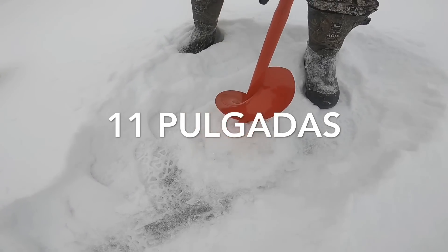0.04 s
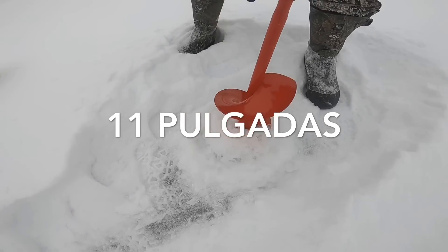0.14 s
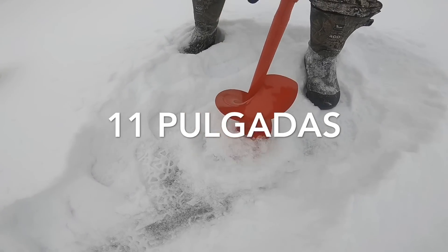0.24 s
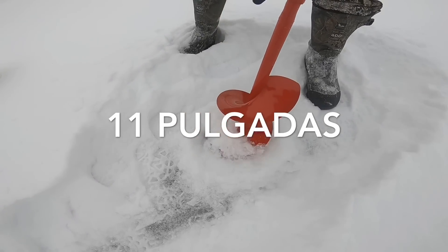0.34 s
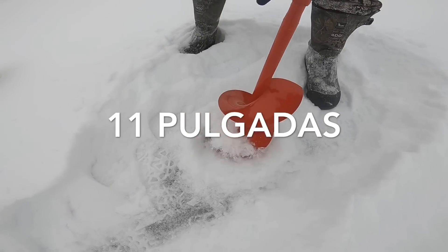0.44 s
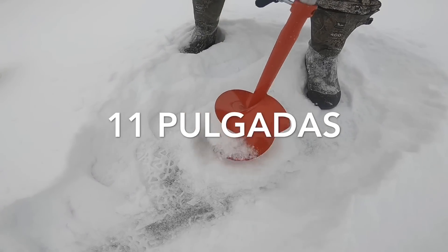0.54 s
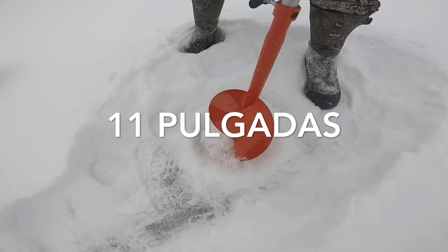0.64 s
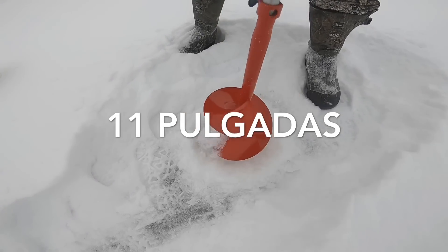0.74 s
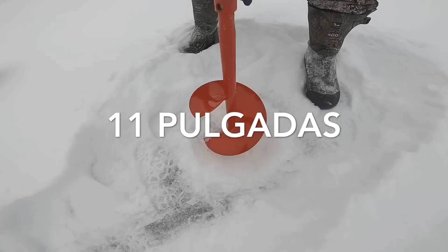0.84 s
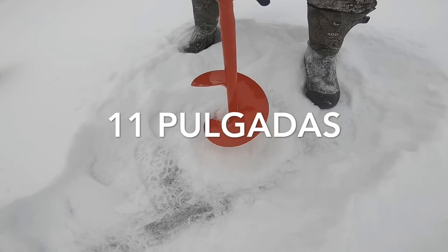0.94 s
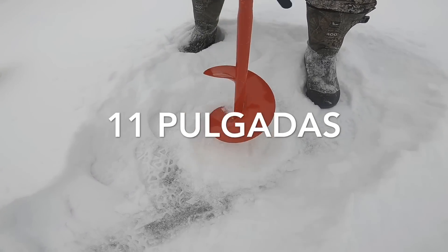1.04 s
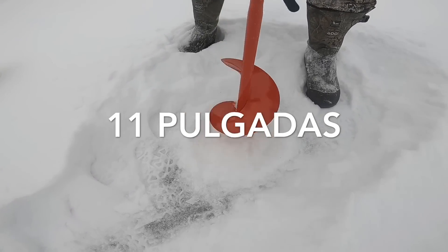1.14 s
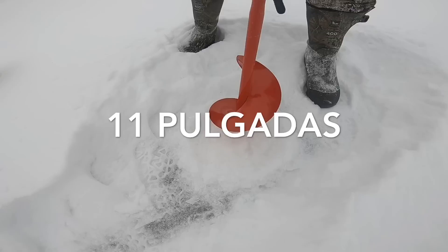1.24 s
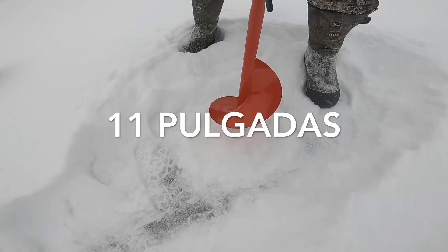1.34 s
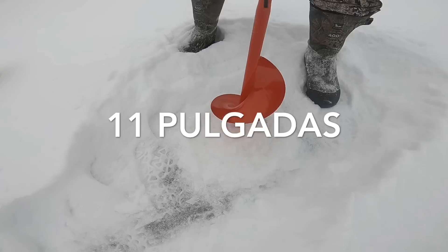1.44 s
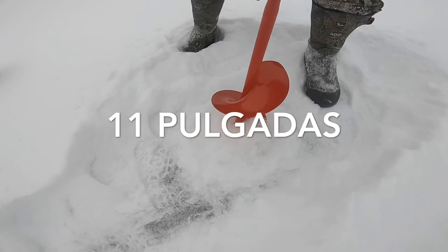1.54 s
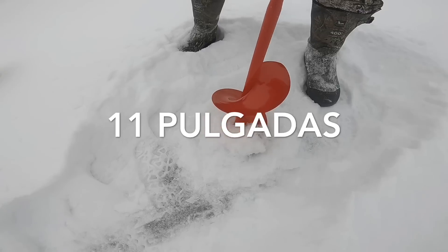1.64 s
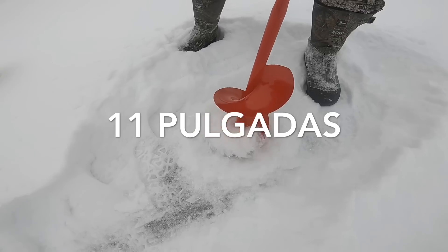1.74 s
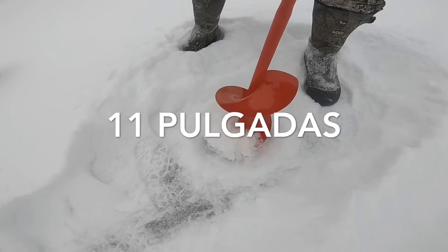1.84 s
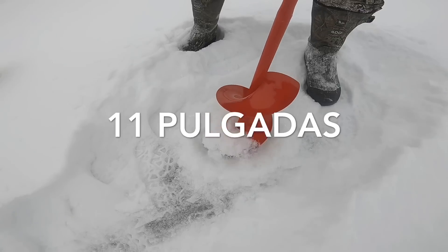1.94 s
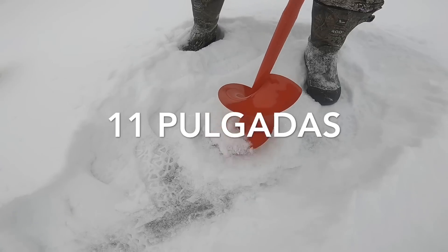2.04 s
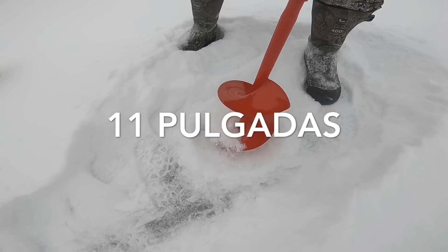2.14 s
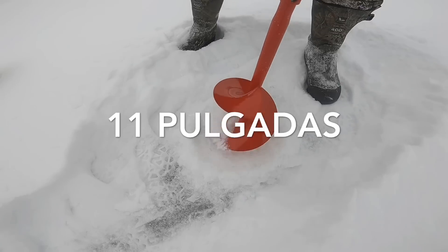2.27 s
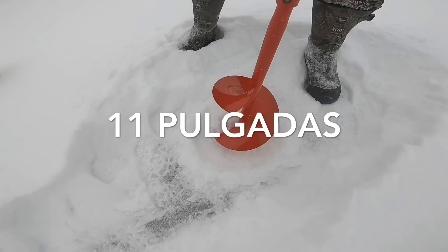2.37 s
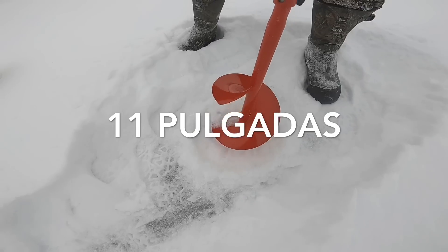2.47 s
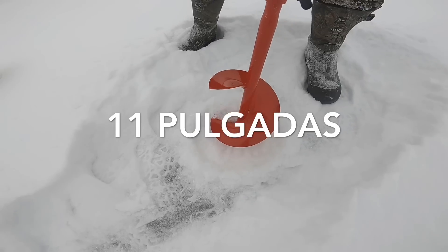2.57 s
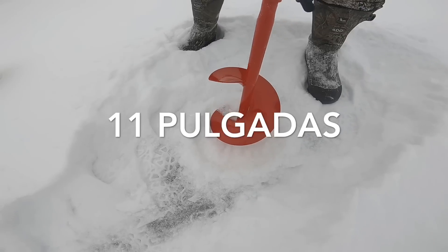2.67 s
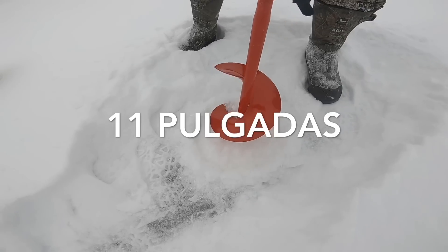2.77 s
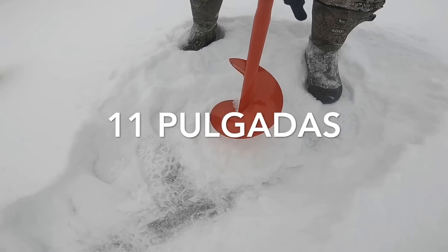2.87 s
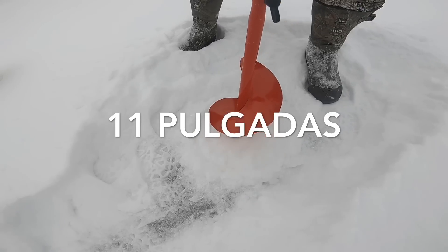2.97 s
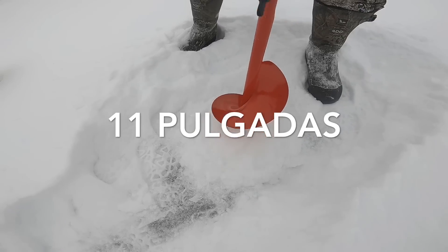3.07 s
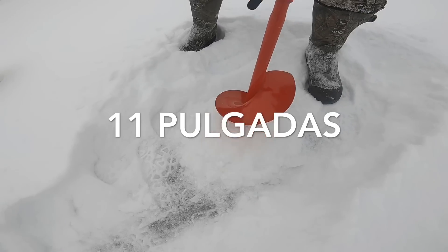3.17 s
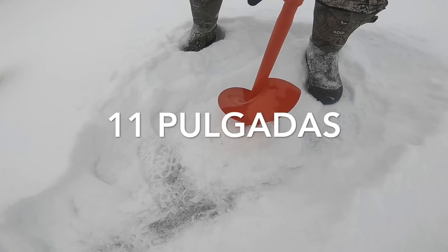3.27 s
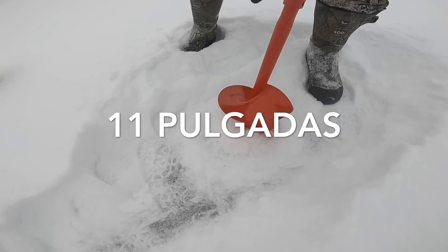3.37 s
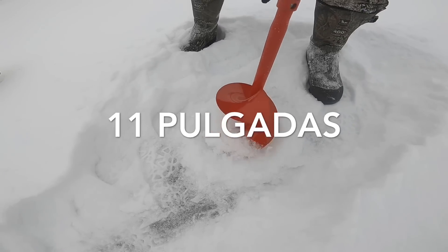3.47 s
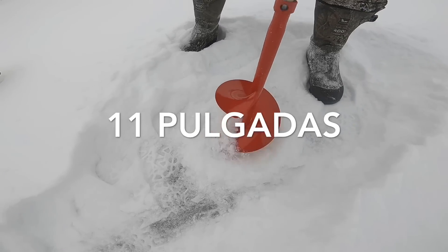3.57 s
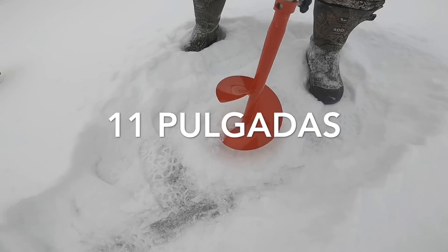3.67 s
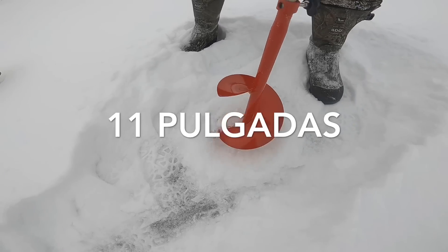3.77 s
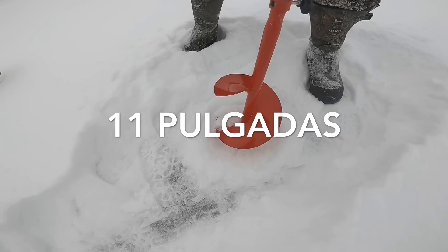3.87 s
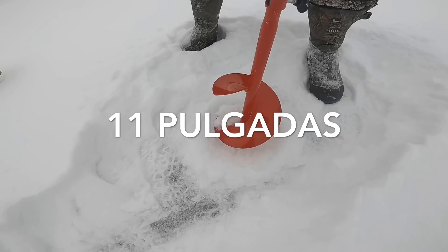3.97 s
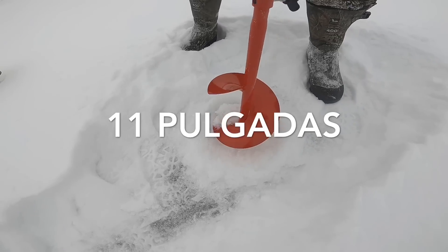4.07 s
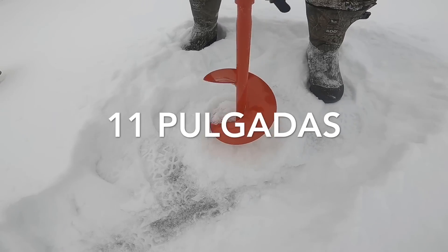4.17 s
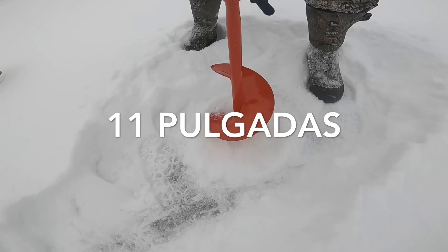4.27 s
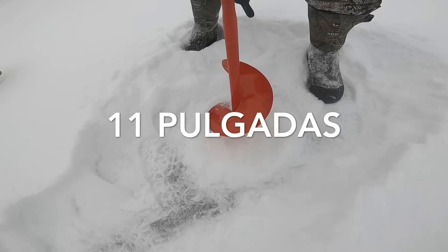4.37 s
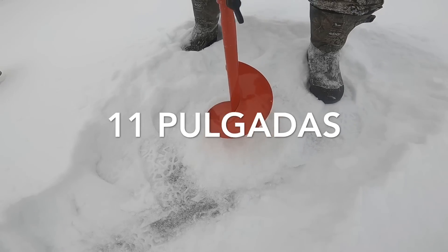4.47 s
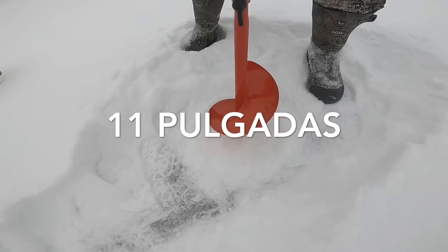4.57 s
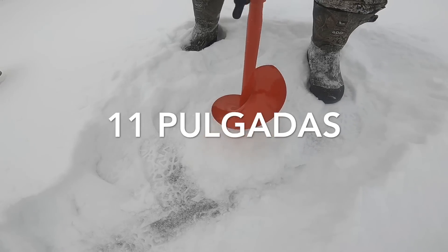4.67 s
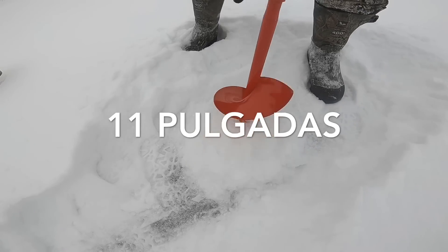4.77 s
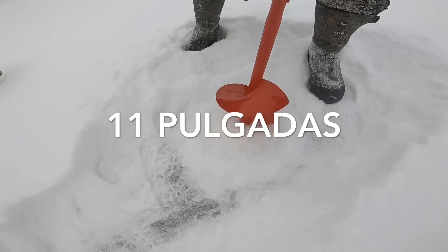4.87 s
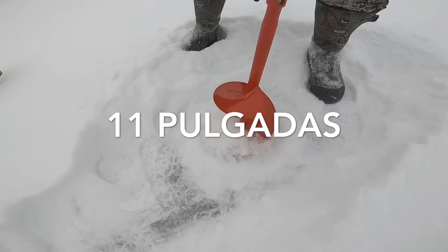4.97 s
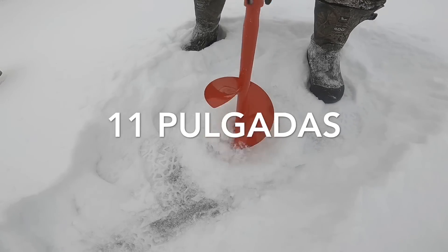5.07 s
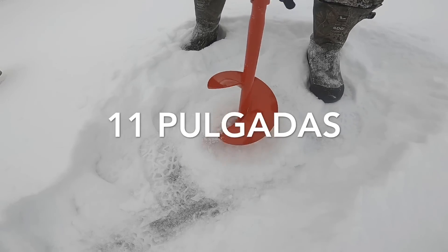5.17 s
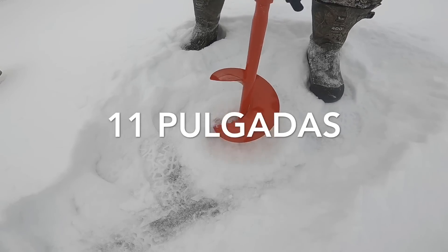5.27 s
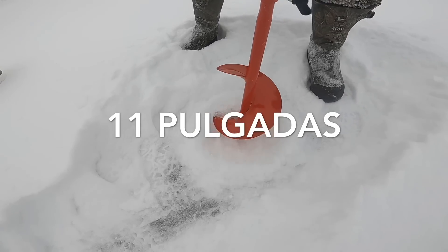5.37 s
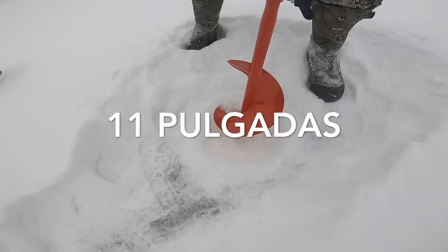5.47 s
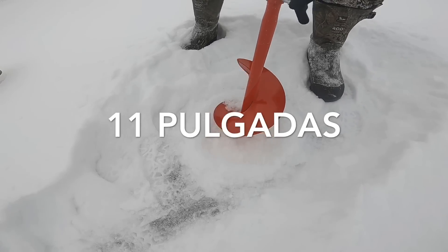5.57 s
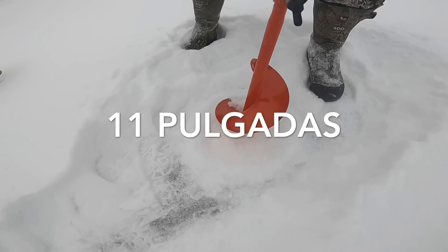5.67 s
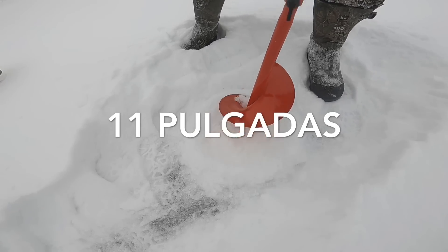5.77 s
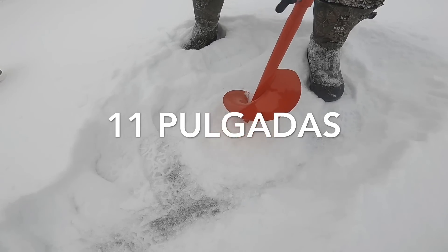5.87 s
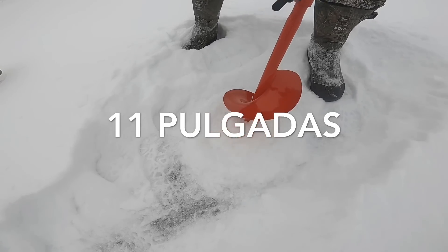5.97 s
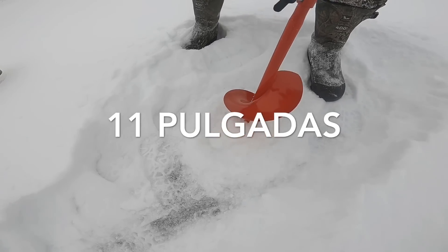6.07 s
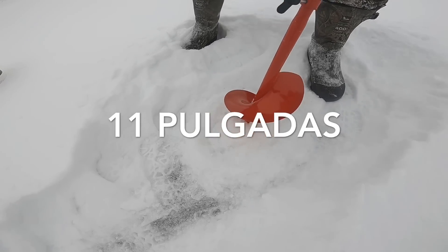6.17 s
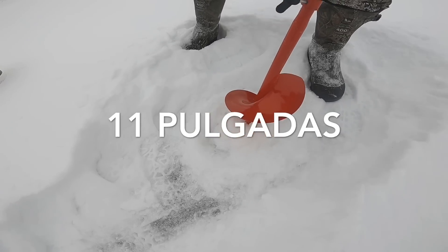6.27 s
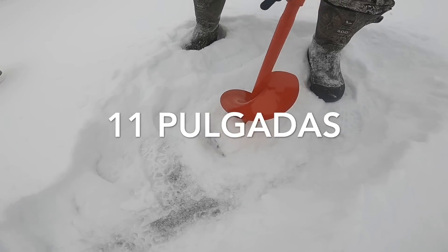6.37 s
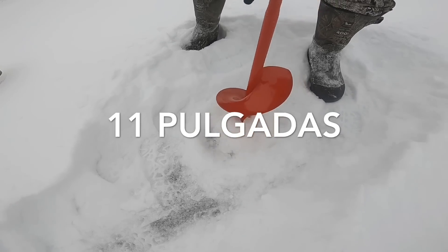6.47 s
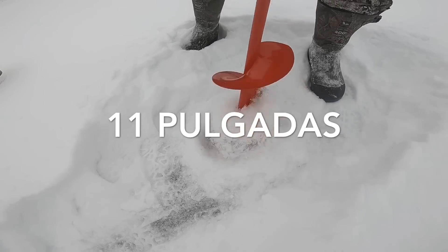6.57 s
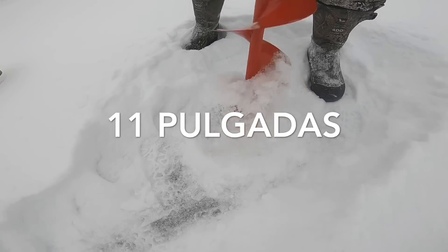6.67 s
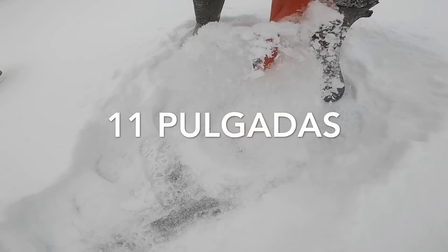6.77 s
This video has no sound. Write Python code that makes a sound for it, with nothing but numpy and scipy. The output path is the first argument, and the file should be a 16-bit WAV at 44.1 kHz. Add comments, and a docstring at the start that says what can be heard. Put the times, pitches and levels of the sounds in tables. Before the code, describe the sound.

Close stereo pickup in quiet open air: steel blades scrape and crunch through ice in irregular hand-cranked strokes, first separate, then running together. A hollow mid-pitched hum and metallic ring colour the coarse, crackly grating. Blades catch with dry snaps, particularly before and during the second half. After the last stroke come near-silence, a loud crack, a short clanky scrape as the auger is lifted, and loose snow rustling faintly.

```python
"""Hand auger in lake ice

A hand auger is cranked into lake ice, close by, in the open air. Stick-slip bites of the blades
release trains of tiny fractures, which drive the resonances of the steel spiral; the blades ring most
when they face the listener. Sharp catches and single chips snap off during the pushes and in the pauses.
At the end the auger is pulled up with a bright scrape; loose snow and shavings rustle, over faint air.
"""
import sys
import numpy as np
from scipy import signal
from scipy.fft import rfft, irfft
from scipy.io import wavfile
from scipy.ndimage import uniform_filter1d

SR = 44100
rng = np.random.default_rng(int(sys.argv[2]) if len(sys.argv) > 2 else 0)


def unload_audio(sound):
    """Save the sound as a 16-bit wav file, at the path given as the first command line argument."""
    columns = np.transpose(np.atleast_2d(sound))
    # keep every value between -1 and 1, then stretch to whole-number steps
    steps = np.round(np.clip(columns, -1, 1) * 32767)
    wavfile.write(sys.argv[1], SR, steps.astype(np.int16))


N = 300762  # samples

# Pushes on the crank, each a cut; the last row is a second crunch as the auger lifts:
# start t/s, end t/s, level/dB, swell from start to end/dB, thud of coarse chips re cut/dB,
# favoured resonance f/Hz, relative level of that resonance/dB
CUTS = [(-0.02, 0.131, -26.5, -1.5, -4.5, 2330, -9), (0.433, 0.626, -24.5, -7, -8.5, 885, -9),
        (0.673, 0.929, -24, 7.5, -10, 2960, -10), (0.908, 1.09, -30, -3, -4, 1980, -4.5),
        (1.079, 1.292, -27.5, 1.5, -15.5, 2640, -22), (1.397, 1.548, -29, 0.5, -8, 1630, -11),
        (1.697, 1.861, -28.5, 14, -9, 650, -3), (1.936, 1.965, -31, 1, 2.5, 846, 1.5),
        (2.025, 2.176, -24.5, 3.5, -12.5, 2860, -10.5), (2.168, 2.425, -26.5, 4.5, -10.5, 598, -3),
        (2.444, 2.588, -27.5, 8, -3, 575, -3), (2.603, 2.86, -28, 5, -0.5, 2010, -2.5),
        (2.854, 3.095, -28.3, 7, -4.5, 1970, -3), (3.08, 3.423, -27, -2, -1, 3190, -7),
        (3.376, 3.729, -26.5, 1, -2.5, 3100, -14), (4.126, 4.229, -27, 4.5, 2, 590, -7),
        (4.272, 4.458, -27, -5, -5.5, 1310, -8.5), (4.482, 4.683, -25.5, 2.5, -7, 1650, -13),
        (4.679, 4.838, -25, 1, -11, 3330, -5), (4.851, 5.117, -25.5, 1, -13, 1730, -11.5),
        (5.117, 5.27, -33, -12, -11.5, 533, -7), (5.278, 5.596, -31.5, 0.5, -4.5, 1960, -4.5),
        (5.585, 5.916, -26, 2.5, -6.5, 2040, -5), (6.594, 6.63, -29.5, -4.5, 2, 900, -5)]
# Light scraping of the resting blades between cuts: start t/s, end t/s, level/dB
DRAGS = [(0.454, 1.585, -36), (1.668, 1.965, -36.5), (1.995, 3.735, -35.5), (4.04, 4.1, -37),
         (4.136, 4.46, -31.5), (4.5, 5.92, -35), (6.206, 6.231, -33), (6.486, 6.528, -34.5)]
# Moments when the blades face the listener, once a turn: t/s
FACING_TIMES = [0.1, 1.72, 3.15, 4.63, 5.82]
# Single chips snapping off: t/s, relative level/dB
TICKS = [(0.046, -17), (0.537, -20), (0.582, -21), (0.6, -19), (0.646, -17.5), (1.178, -22.5), (1.215, -23),
         (2.056, -16), (3.006, -22.5), (3.669, -14.5), (4.829, -19), (5.522, -18), (5.55, -17.5),
         (6.017, -38.5), (6.117, -32), (6.172, -32.5), (6.363, -35.5)]
# Blades catching and cracking the ice: t/s, relative level/dB, thud re that/dB, fizz re that/dB (offsets follow)
CRACKS = [(0.44, -5.5, -38, -18), (1.051, -7.5, -32, -24), (1.665, -21, -11, -17), (1.749, -6, -42, -18),
          (1.859, -7, -21, -14.5), (1.891, -4, -26, -14), (2.007, -6, -18, -14), (2.413, -14, -7, -8.5),
          (3.943, -14, -25, -17.5), (4.027, -10, -32, -19), (4.106, -12.5, -15.5, -6),
          (4.138, -3, -20.5, -19), (4.204, -8, -12, -22), (4.273, -10, -20, -16), (4.431, -10, -15, -31.5),
          (4.45, -10.5, -14.5, -12), (4.493, -8, -18, -25), (4.607, -8, -22, -15), (4.872, -9.5, -16, -26),
          (6.207, -0.5, -17, -20.5), (6.487, -13.5, -17, -16)]
# Decay of a crack in the voices thud, plate, blade, crunch, fizz: 60 dB decay time t/s
CRACK_T60 = [0.11, 0.016, 0.046, 0.03, 0.038]
# Broad colour of the auger in the ice: f/Hz, relative level/dB
BODY_COLOUR = [(25, -22.5), (60, -6.5), (150, 4.5), (260, -2), (390, -11.5), (480, -9), (1280, -2),
               (2100, -2.5), (3800, -6), (4700, -21), (5400, -15), (6900, -19), (9000, -35), (12400, -37),
               (15000, -54)]
# Resonances of the steel spiral and shaft: f/Hz, width f/Hz, level over the broad colour/dB
BODY_MODES = [(497.4, 44, 7.5), (606.7, 126, 10), (861, 88, 7.5), (1000, 165, 3), (1617, 143, 10),
              (1806, 65, 4), (3353, 200, 5)]
# Thin note of the blade edge: start t/s, f/Hz, initial level/dB, 60 dB decay time t/s
EDGE_NOTE = (4.5, 5495, -28, 0.22)
# Pulling the auger up: t/s, level/dB
LIFT_LEVEL = [(6.5, -42), (6.539, -29.5), (6.554, -15.5), (6.578, -18), (6.599, -31)]
# Broad colour of the lifting scrape: f/Hz, relative level/dB
LIFT_COLOUR = [(40, -32), (200, -4), (350, -15.5), (3400, -7.5), (4600, -15), (7000, -12), (9000, -27),
               (15000, -35)]
# Resonances of the freed blades: f/Hz, width f/Hz, level over the broad colour/dB
LIFT_MODES = [(506, 160, 9), (935, 80, 9), (1090, 57, 9), (1710, 110, 10), (2564, 96, 10.5),
              (6070, 400, 9.5)]
# Soft rustle of loose snow: t/s, level/dB
RUSTLE_LEVEL = [(.3, -55.5), (1.63, -52.5), (3.85, -59.5), (6.0, -56), (6.42, -51.5), (6.73, -43),
                (6.82, -52)]
# Colour of the rustle: f/Hz, relative level/dB
RUSTLE_COLOUR = [(330, -11), (850, 3.5), (4700, 1.5), (6800, 6.5), (8800, -8), (12500, -10), (15000, -27)]
# Colour of the air: f/Hz, relative level/dB
AIR_COLOUR = [(60, 0), (165, 4.5), (650, -29)]
# Two microphone ports, level difference: f/Hz, left re right level/dB
PORT_BALANCE = [(200, -4), (480, -8.5), (640, -11), (1100, 0), (4000, -1), (8300, 0.1)]
# Two microphone ports, phase difference: f/Hz, lead of left [rad]
PORT_PHASE = [(300, 0.11), (540, 0.4), (720, 1.35), (1450, 1.11), (2400, 0.2)]
# Two microphone ports, coherence: f/Hz, likeness [0 to 1]
PORT_LIKENESS = [(30, 0.76), (100, 0.98), (5500, 1), (9000, 0.28), (12500, 0.93)]

ATTACK_S, RELEASE_T60_S = 0.018, 0.049  # the blades dig in and let go
ARCH_DB = 1.5  # rise from the ends of a cut to its middle
DRAG_THUD_DB = -4  # coarse chips of a drag, relative to the drag
RING_DB, RING_SWING_DB = -8.5, 10.5  # blade ring when turned away (relative), its rise when facing
RING_FOCUS = 1.38  # exponent: a higher one narrows the beam
FIZZ_DB = -10.5  # fine chips, relative
STICK_S, STICK_DB = 0.0094, -4  # length and depth of the stall before the ice cracks
SLIPS_PER_S, SLIP_JITTER = 75, 0.65  # median rate of bites, spread of their log interval
SLIP_DB = 4  # fall of each crunch until the next bite
BITE_DB, BITE_COLOUR_DB = 2.0, 1.3  # limit of the strength variation, spread of each voice
HUM_HZ, HUM_DRIFT, HUM_DB = 593.3, 0.027, -3  # pitch, rms relative drift, relative level
TICK_S = 0.0011  # rise time of a tick
AIR_DB = -56.5
CEILING, EDGE_HZ = .7, 14900  # saturation amplitude, upper band limit


def gain_of(db):
    """Level is twenty times the decimal logarithm of amplitude; this inverts it."""
    return 10 ** (np.asarray(db) / 20)


def evened(x):
    """Normalization to a root-mean-square amplitude of 1."""
    return x / np.sqrt(np.mean(x ** 2) + 1e-20)


def read(points, hz):
    """Linear interpolation of a spectrum on a logarithmic frequency axis."""
    f, value = np.transpose(points)
    return np.interp(np.log(hz + 1), np.log(f + 1), value)


def curve(rows):
    """Linear interpolation in time: each column of a table, sample by sample."""
    s, *columns = np.transpose(rows)
    return [np.interp(np.arange(N) / SR, s, c) for c in columns]


def sounding(rows):
    """Gating: gain along a level curve, zero outside it."""
    t = np.arange(N) / SR
    inside = (t >= rows[0][0]) * (t <= rows[-1][0])
    return gain_of(curve(rows)[0]) * inside


def wander(per_s):
    """Band-passed noise: a smooth random course of rms 1 that changes at about the given rate."""
    ratio = np.fft.rfftfreq(N, 1 / SR) / per_s
    spectrum = rfft(rng.standard_normal(N)) * ratio / (1 + ratio ** 3)
    return evened(irfft(spectrum, N))


def response(colour, modes=(), size=4096):
    """Minimum phase: log magnitude fixes a causal impulse response, here of energy 1."""
    hz = abs(np.fft.fftfreq(size, 1 / SR))
    db = read(colour, hz)
    db = db + sum(lift * np.exp(-2 * ((hz - f) / width) ** 2) for f, width, lift in modes)
    spectrum = np.exp(signal.hilbert(np.log(gain_of(db))).conj())
    taps = np.fft.ifft(spectrum).real
    return taps / np.linalg.norm(taps)


def ring(x, taps):
    """Convolution: a pair of signals excites an impulse response."""
    return signal.oaconvolve(x, taps[None], axes=1)[:, :x.shape[1]]


def resonate(pair, hz, width_hz):
    """Heterodyning: a steep resonance follows the curve hz and keeps the level of noise."""
    t = np.arange(2048) / SR
    decay = t * np.exp(-np.pi * width_hz * t)
    turn = np.exp(2j * np.pi * np.cumsum(hz) / SR)
    shifted = ring(pair / turn, decay / np.linalg.norm(decay))
    return np.sqrt(2) * (turn * shifted).real


def chips(per_s, spread_db, scatter, scatter_t60):
    """Shot noise: tiny fractures of uneven size, each a click and a decaying scatter of splinters."""
    size = gain_of(spread_db * np.minimum(rng.exponential(1, N), 4))
    size = size * (rng.random(N) < per_s / SR)
    energy = signal.lfilter([1], [1, -gain_of(-120 / (scatter_t60 * SR))], size ** 2)
    clicks = size * rng.choice([-1, 1], (2, N))
    splinters = np.sqrt(energy) * rng.standard_normal((2, N))
    return evened(evened(clicks) + scatter * evened(splinters))


def bites():
    """Stick-slip friction: the count rises by one with each bite, at uneven intervals."""
    lengths = np.exp(SLIP_JITTER * rng.standard_normal(N)) / SLIPS_PER_S
    return np.interp(np.arange(N) / SR, np.cumsum(lengths), np.arange(N))


def each_bite(count):
    """Sample and hold: a random value of about rms 1 lasts one bite and jumps at the next."""
    return uniform_filter1d(rng.standard_normal(N)[count.astype(int)], size=48)


def slips(count):
    """Relaxation oscillation: each bite starts abruptly at its own strength, then dies down."""
    strength_db = BITE_DB * np.tanh(each_bite(count))
    fall_db = SLIP_DB * uniform_filter1d(count % 1, size=48)
    return gain_of(strength_db - fall_db)


def sticking():
    """Static friction: the blades stall, dipping the gain just before each crack or tick."""
    stuck = np.zeros(N)
    for s, *_ in CRACKS + TICKS:
        stuck[round((s - STICK_S) * SR):round(s * SR)] = 1
    return gain_of(STICK_DB * uniform_filter1d(stuck, size=128))


def facing():
    """Directivity: 1 when the blades face the listener, 0 half a turn later."""
    turns = np.interp(np.arange(N) / SR, FACING_TIMES, np.arange(len(FACING_TIMES)))
    return np.cos(np.pi * turns) ** 2


def contact(start, end):
    """Contact envelope: linear attack, hold and exponential release."""
    t = np.arange(N) / SR
    attack = np.clip((t - start) / ATTACK_S, 0, 1)
    return attack * gain_of(-60 * np.clip((t - end) / RELEASE_T60_S, 0, 2))


def cut_strengths():
    """Applied force: for each cut, its strength over time and its thud in dB."""
    t = np.arange(N) / SR
    for start, end, db, swell_db, thud_db, _, _ in CUTS:
        along = np.clip((t - start) / (end - start), 0, 1) - .5
        arch = ARCH_DB * (np.cos(np.pi * along) - .5)
        yield contact(start, end) * gain_of(db + swell_db * along + arch), thud_db


def cutting(cuts):
    """Addition of powers: strength of cuts and drags, and their share of coarse chips in dB."""
    power = sum(gain ** 2 for gain, _ in cuts) + 1e-12
    coarse = sum((gain * gain_of(thud_db)) ** 2 for gain, thud_db in cuts) + 1e-12
    drag = sum((contact(start, end) * gain_of(db)) ** 2 for start, end, db in DRAGS)
    drag = np.maximum(drag - power, 0)  # drags only fill in where the cuts are weaker
    total = power + drag
    return np.sqrt(total), 10 * np.log10((coarse + drag * gain_of(DRAG_THUD_DB) ** 2) / total)


def grinding(cuts, count, plate_db=0.5, plate_share=0.46):
    """Clumped brittle fracture under the blades exerts a force on each voice of the auger."""
    bite, thud = cutting(cuts)
    blade = RING_DB + RING_SWING_DB * facing() ** RING_FOCUS
    plate = plate_db + plate_share * thud  # coarse chips also shake the wide spiral
    fractures = chips(per_s=3400, spread_db=1.5, scatter=1, scatter_t60=0.026)
    force = bite * sticking() * evened(slips(count) * fractures)
    voices_db = [db + BITE_COLOUR_DB * each_bite(count) for db in (thud, plate, blade, 0, FIZZ_DB)]
    return gain_of(voices_db)[:, None] * force


def singing(cuts, count, width_share=0.2):
    """Loaded resonance: each cut loads the steel differently, so a broad mode of its own stands out."""
    fractures = chips(per_s=1500, spread_db=4.0, scatter=0.95, scatter_t60=0.014)
    drive = sticking() * evened(slips(count) * fractures)
    out = np.zeros((2, N))
    for (gain, _), (start, end, *_, hz, db) in zip(cuts, CUTS):
        part = slice(max(round(start * SR), 0), round((end + RELEASE_T60_S) * SR))
        pitch = np.full_like(gain[part], hz)
        out[:, part] += gain_of(db) * resonate(gain[part] * drive[:, part], pitch, width_share * hz)
    return out


def humming(cuts, width_hz=85, coarse_share=0.55):
    """Noise-driven resonance: the spiral hums, louder on coarse chips, its pitch wandering at random."""
    bite, thud = cutting(cuts)
    level = bite * sticking() * gain_of(HUM_DB + coarse_share * thud)
    drive = level * rng.standard_normal((2, N))
    return resonate(drive, HUM_HZ * (1 + HUM_DRIFT * wander(per_s=7.0)), width_hz)


def loose_snow():
    """Granular flow: grains of snow and shavings slide and fall, as filtered shot noise."""
    falls = chips(per_s=980, spread_db=6.0, scatter=2.0, scatter_t60=0.18)
    grains = ring(falls, response(RUSTLE_COLOUR))
    return gain_of(curve(RUSTLE_LEVEL)[0]) * evened(grains)


def air():
    """Filtered noise: the faint low rumble of the open lake, swelling a little."""
    rumble = ring(rng.standard_normal((2, N)), response(AIR_COLOUR))
    return gain_of(AIR_DB) * evened(rumble * gain_of(2 * wander(per_s=14.0)))


def ticking(thud_db=-15, plate_db=-13, blade_db=-6, fizz_db=-9):
    """Impulsive excitation: a single chip is a noise burst of a few milliseconds, mostly crunch."""
    t = np.arange(1024) / SR
    hits = np.zeros(N)
    for s, db in TICKS:
        hits[round(s * SR)] = gain_of(db)
    burst = signal.oaconvolve(hits, t / TICK_S * np.exp(1 - t / TICK_S))[:N]
    voices = gain_of([thud_db, plate_db, blade_db, 0, fizz_db])
    return voices[:, None, None] * burst * rng.standard_normal((2, N))


def cracking(crack_db=-9.5, thud_db=8, plate_db=-4, blade_db=-4, fizz_db=8, rise_s=0.001104, hold_s=0.00054):
    """Fracture avalanche: a sharp snap, then fractures that die away at a rate of each voice's own."""
    t = np.arange(SR // 2) / SR
    fall_db = 60 * np.maximum(t - hold_s, 0) / np.array(CRACK_T60)[:, None]
    burst = (1 - np.exp(-t / rise_s)) * gain_of(-fall_db)
    avalanche, snap = np.zeros((2, len(burst), N + len(t)))
    for s, db, thud, fizz in CRACKS:
        voices_db = np.array([thud + thud_db, plate_db, blade_db, 0, fizz + fizz_db])
        voices = gain_of(db + crack_db + voices_db)
        avalanche[:, round(s * SR):][:, :len(t)] += voices[:, None] * burst
        snap[:, round((s + rise_s) * SR)] += voices * gain_of(12)
    fractures = chips(per_s=9900, spread_db=-3.0, scatter=0.55, scatter_t60=0.032)
    return snap[:, None, :N] + avalanche[:, None, :N] * fractures


def edge_note():
    """Free vibration: a thin note of the blade edge, a sine that decays exponentially."""
    s, hz, db, t60 = EDGE_NOTE
    t = np.maximum(np.arange(N) / SR - s, 0)
    return gain_of(db - 60 * t / t60) * np.sin(2 * np.pi * hz * t)


def lifting(crumble_db=1.0):
    """Scraping excitation: the blades rise through crumbling slush, whose fractures make them ring."""
    fractures = chips(per_s=4500, spread_db=-4.5, scatter=0.82, scatter_t60=0.021)
    crumbs = evened(gain_of(crumble_db * wander(per_s=230)) * fractures)
    return ring(sounding(LIFT_LEVEL) * crumbs, response(LIFT_COLOUR, LIFT_MODES))


def below(hz, edge):
    """Low-pass weighting with a steep, smooth edge, symmetric about zero."""
    return 1 / (1 + (hz / edge) ** 12)


def auger(forces, thud_hz=390, plate_hz=730, blade_hz=(880, 1635), blade_width_hz=105, fizz_hz=4400,
          blade_db=-2.0, crunch_db=-2.5):
    """Forced vibration of one body in five bands: ice thud, spiral plate, blades, crunch and fizz."""
    hz = np.fft.rfftfreq(N, 1 / SR)
    body = rfft(response(BODY_COLOUR, BODY_MODES), N)
    thud, low, middle = below(hz, thud_hz), below(hz, plate_hz), below(hz, fizz_hz)
    blade = sum(below(hz - f, blade_width_hz) for f in blade_hz)
    voices = [thud, low - thud, blade, middle - low - blade, 1 - middle]
    levels = gain_of([0, 0, blade_db, crunch_db, 0])
    total = 0
    for force, voice, level in zip(forces, voices, levels):
        band = body * voice
        band = band / np.sqrt(np.mean(abs(band) ** 2))  # equal energy in every voice
        total = total + level * rfft(force) * band
    return irfft(total, N)


def spiral_reflections(pair, echo=0.23, delay_s=(.0013, .0029, .0052), sway=0.0653):
    """Comb filtering: short reflections off the spiral wander in delay, so the colour keeps shifting."""
    n = np.arange(N)
    # only short waves bounce off it
    upper = signal.sosfilt(signal.butter(2, 900, "high", fs=SR, output="sos"), pair)
    out = pair.copy()
    for delay in delay_s:
        late = n - SR * delay * (1 + sway * wander(per_s=0.82))
        out += echo * np.array([np.interp(late, n, side) for side in upper])
    return out


def ports(pair):
    """Partial coherence: a common and a separate part mix into the sound at two close microphone ports."""
    hz = np.fft.rfftfreq(N, 1 / SR)
    common, apart = rfft(pair)
    same = np.clip(read(PORT_LIKENESS, hz), 0, 1)
    apart = apart * np.sqrt((1 - same) / (1 + same))
    lean = gain_of(read(PORT_BALANCE, hz) / 2) * np.exp(.5j * read(PORT_PHASE, hz))
    sides = np.array([(common + apart) * lean, (common - apart) / lean])
    return irfft(sides * 2 / abs(lean + 1 / lean), N)


def scene():
    """Superposition: the auger grinds, sings, hums, cracks and is lifted, over loose snow and air."""
    cuts, count = list(cut_strengths()), bites()
    forces = grinding(cuts, count) + ticking() + cracking()
    steel = auger(forces) + singing(cuts, count) + humming(cuts)
    return ports(spiral_reflections(steel) + loose_snow() + air() + edge_note() + lifting())


def record(dry):
    """Soft saturation rounds off the highest peaks; a linear-phase low-pass then limits the band."""
    rounded = dry / (1 + (dry / CEILING) ** 4) ** (1 / 4)
    taps = signal.firwin(301, EDGE_HZ, window=("kaiser", 9), fs=SR)
    return signal.oaconvolve(rounded, taps[None], "same")


dry = scene()
out = record(dry)
unload_audio(out)
```